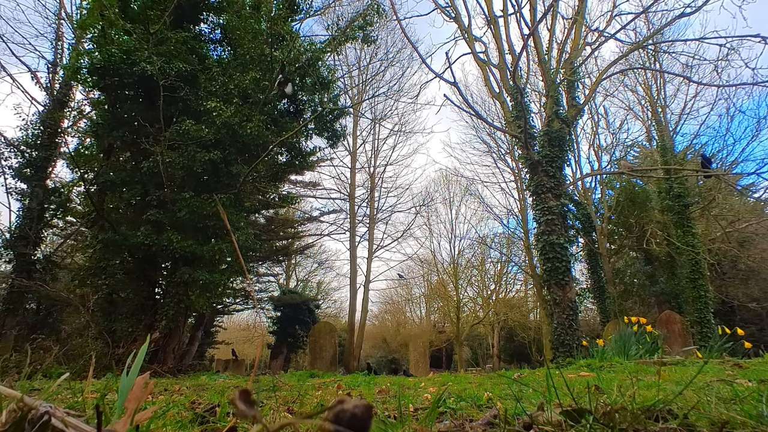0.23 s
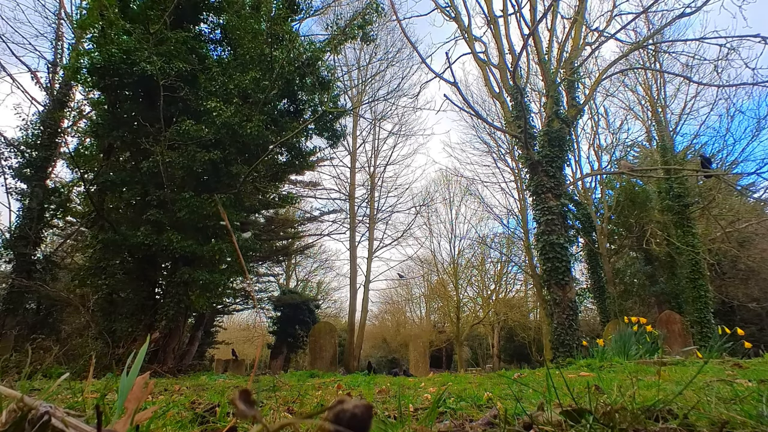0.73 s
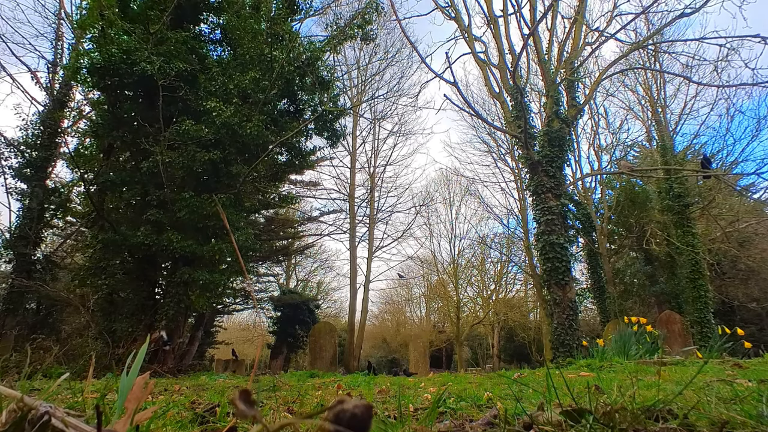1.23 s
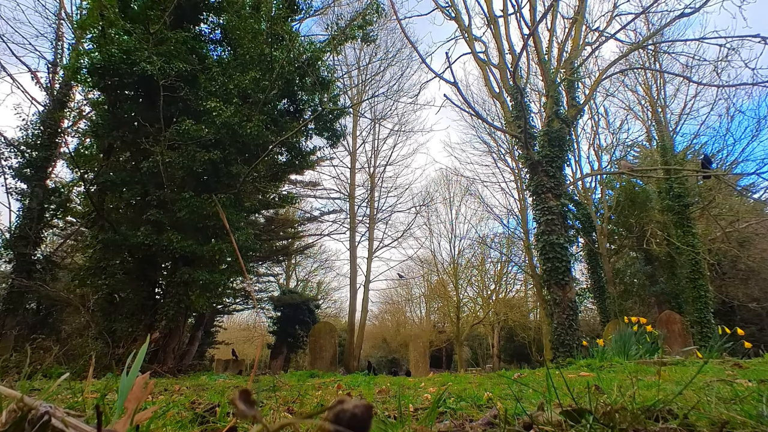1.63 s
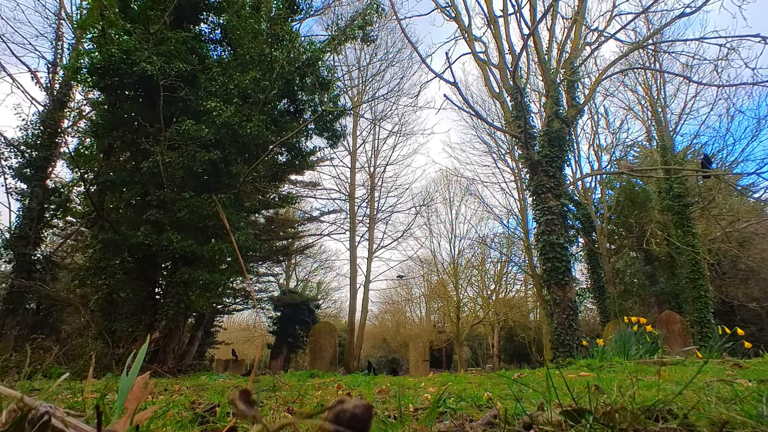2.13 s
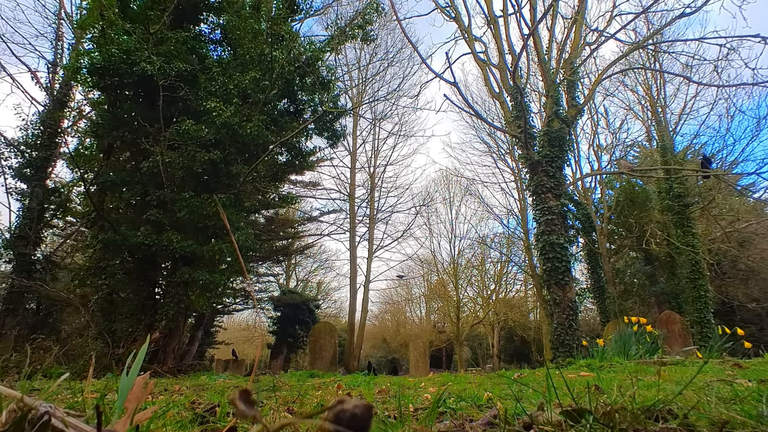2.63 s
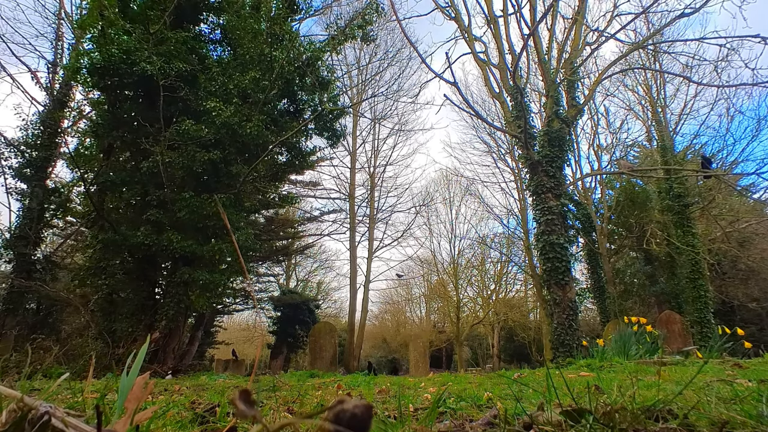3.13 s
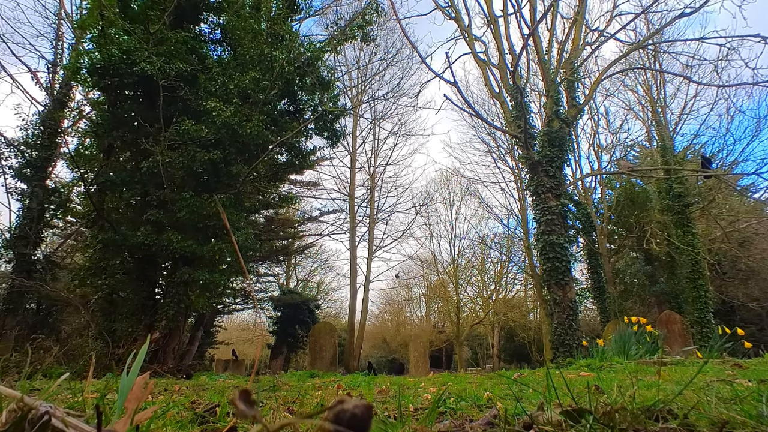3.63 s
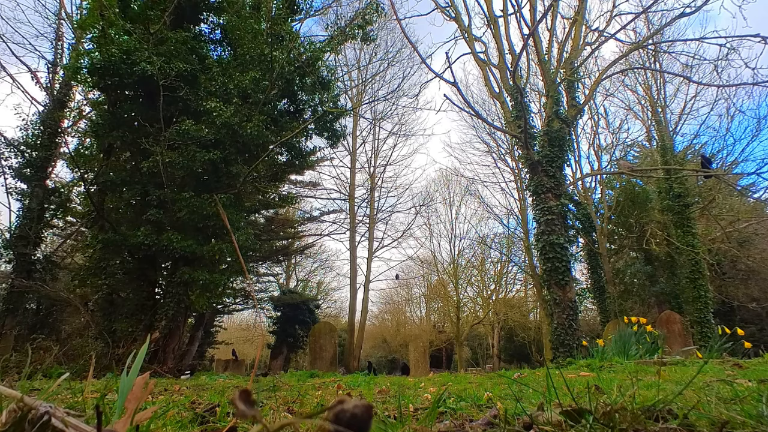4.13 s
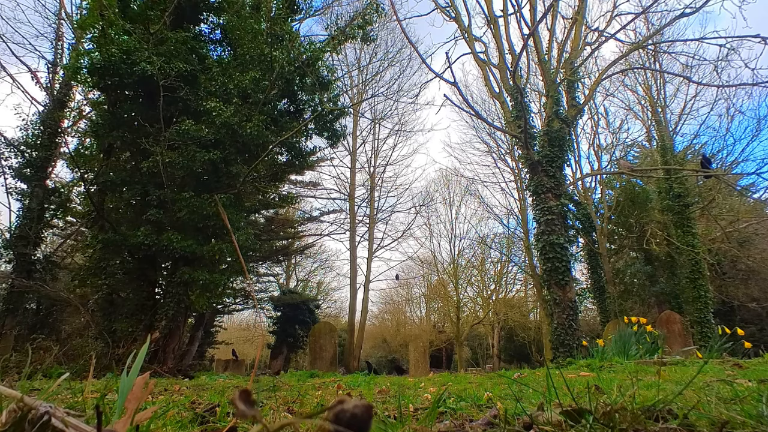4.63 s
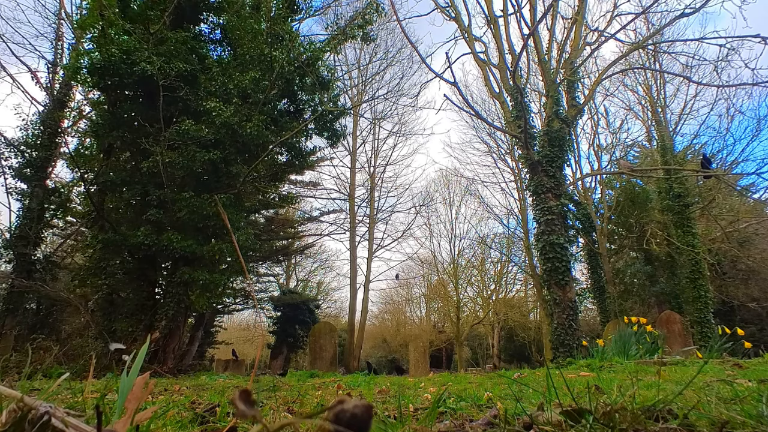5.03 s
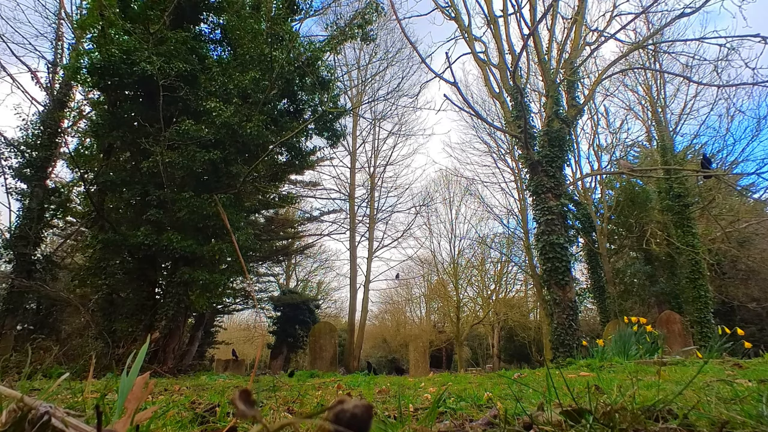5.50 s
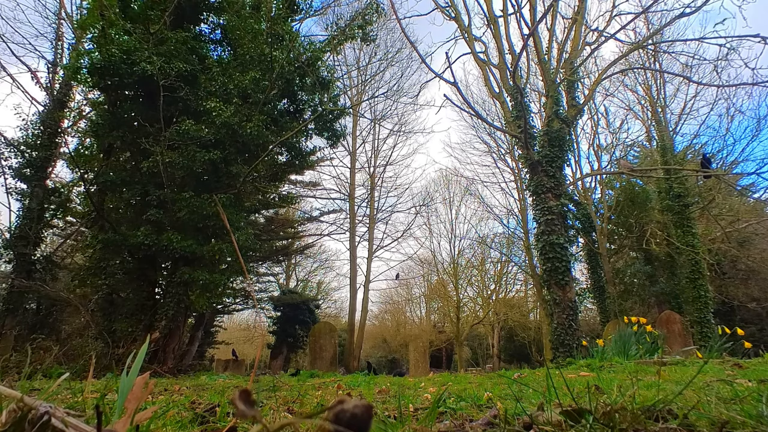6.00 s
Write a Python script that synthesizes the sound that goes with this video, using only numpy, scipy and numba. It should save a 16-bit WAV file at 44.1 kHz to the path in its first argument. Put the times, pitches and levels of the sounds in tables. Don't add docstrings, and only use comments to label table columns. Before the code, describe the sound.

Two distant crows trade rough caws, a plane drones low and fades, small birds peep, and a closer crow gives a loud ringing caw.

```python
import sys
import numpy as np
from scipy import signal
from scipy.fft import rfft, irfft, next_fast_len
from scipy.io import wavfile
from scipy.ndimage import uniform_filter1d
from numba import njit

SR = 44100
rng = np.random.default_rng(int(sys.argv[2]) if len(sys.argv) > 2 else 0)


def voltage_ratio(decibels):
    exponent = np.asarray(decibels, float) / 20
    return 10 ** exponent


def store_wav(level_fs):
    pcm = np.round(np.clip(np.atleast_2d(level_fs), -1, 1) * 32767)
    wavfile.write(sys.argv[1], SR, pcm.T.astype(np.int16))


N = 276066


def unit(x):
    return x / np.sqrt(np.mean(x ** 2))


def even(x):
    return x / np.sqrt(uniform_filter1d(x ** 2, size=1800) + 1e-12)


def steep(x, hz, kind):
    return signal.sosfilt(signal.butter(6, hz, kind, fs=SR, output="sos"), x)


def walk(rate, count=N):
    hold = int(SR / rate)
    steps = np.repeat(rng.standard_normal(count // hold + 1), hold)
    return 1.3 * uniform_filter1d(uniform_filter1d(steps, hold), hold)[:count]


def edges(at, fade_s):
    rise = at - at[0] + (at[0] == 0) * N
    fall = at[-1] - at + (at[-1] > N - 9) * N
    return np.clip(np.minimum(rise, fall) / (fade_s * SR), 0, 1)


@njit
def svf(x, hz, width):
    y, band, low = np.empty(len(x)), 0., 0.
    for i in range(len(x)):
        g, k = np.tan(np.pi * hz[i] / SR), width[i] / hz[i]
        v = (band + g * (x[i] - low)) / (1 + g * (g + k))
        band, low, y[i] = 2 * v - band, low + 2 * g * v, k * v
    return y


@njit
def syrinx(pitch, flutter, swing, lag, stretch):
    n = len(pitch)
    pulses, fast, slow = np.zeros(n + 1), np.empty(n), np.empty(n)
    p, q, j, k = 0., 0., 0, 0
    for i in range(n):
        step = pitch[i] * stretch[0, j] * (1 + swing * np.sin(2 * np.pi * (q + lag))) / SR
        p += step
        q += flutter[i] * stretch[1, k] / SR
        if q >= 1:
            q, k = q - 1, k + 1
        if p >= 1:
            p, j = p - 1, j + 1
            pulses[i] += p / step
            pulses[i + 1] += 1 - p / step
        fast[i], slow[i] = p, q
    return pulses[:-1], fast, slow


def shape(start, length, db, sag, bright_db, name):
    gestures = { "falling": [(0, 281.6, -8, 0.1, -27), (.1, 303, -4, 0.1, -2), (.16, 302.6, -0.5, .01, -2),
                (.34, 306.5, -2.5, 0.41, 3), (.47, 304.8, -0.3, 0.88, -2), (.84, 273.6, -.5, 0.75, -4),
                (.93, 256, -3.5, 1.0, -8.5), (1, 254, -18, 0.4, -17)], "growling": [(0, 560, -15, .1, -27),
                (.08, 578, -5.5, .05, -23), (.18, 582, .5, .02, -8.5), (.3, 577, -1.5, .2, -2),
                (.66, 532, -3, .6, 1.4), (.9, 558, -2.5, 0.6, -1.5), (1, 581, -14, 0.84, -14)],
                "ringing": [(0, 314.7, -14, 0.3, -7), (.08, 345.4, -4.5, 0.6, -0.5),
                (.14, 354.2, -1, .4, -1.5), (.26, 360.2, 0.8, 0.7, -3), (.72, 351.6, -2, 0.67, 0.5),
                (.86, 340.2, -6, .5, 5), (.95, 279.5, -5, 1, -3.5), (1, 240, -19, 0.9, 1)], }
    throats = {"falling": (84, 73), "growling": (80.5, 83.5), "ringing": (66, 59)}
    beaks = {"falling": (1230, 1682), "growling": (1135, 1140), "ringing": (1000, 1236)}
    necks = {"falling": (.42, .88, 1820, 2200, 2760, 3260),
             "growling": (0.44, 0.46, 1700, 1710, 2490, 2820),
             "ringing": (0.66, 0.88, 1920, 1600, 2315, 2770)}
    colours = {"falling": (-5.5, 3.4, -5.5, -9.5), "growling": (1, 0.08, -11, -14.5),
               "ringing": (-17.5, 3.5, -15, -25.5)}
    wander = {"falling": .005, "growling": .022, "ringing": .003}
    at = np.arange(max(int(start * SR), 0), min(int((start + length) * SR), N))
    share = (at / SR - start) / length
    where, *columns = np.transpose(gestures[name])
    pitch, swell_db, beak, strain_db = (np.interp(share, where, c) for c in columns)
    (early, late), (shut_hz, open_hz) = throats[name], beaks[name]
    begin, end, hz2a, hz2b, hz3a, hz3b = necks[name]
    db2, follows, db3, rasp_db = colours[name]

    top_hz = max(columns[0])
    pitch = (top_hz + sag * (pitch - top_hz)) * (1 + wander[name] * walk(14, len(at)))
    flutter = early + (late - early) * share
    strain_db = strain_db + bright_db
    neck = np.clip((share - begin) / (end - begin), 0, 1)
    hz1 = pitch / top_hz * (shut_hz + (open_hz - shut_hz) * np.clip(beak, 0, 1))
    hz2, hz3 = hz2a + (hz2b - hz2a) * neck, hz3a + (hz3b - hz3a) * neck
    return (at, pitch, flutter, db + swell_db, hz1, hz2, db2 + follows * strain_db,
            hz3, db3 + strain_db, rasp_db + strain_db, neck)


def caw(at, pitch, flutter, db, hz1, hz2, db2, hz3, db3, rasp_db, neck, name):
    voices = {"falling": (.58, .035, .2), "ringing": (.46, .024, .7), "growling": (.33, .125, .78)}
    roughness = {"falling": (.012, .04, .4), "ringing": (.007, .05, .48), "growling": (.016, .07, .42)}
    chests = {"falling": (788, -5), "ringing": (813, -5.5), "growling": (860, -16.5)}
    mouth_widths = {"falling": (240, 450, 220), "ringing": (300, 850, 300), "growling": (450, 640, 520)}
    loose = {"falling": (1.4, -6, -17, -3), "growling": (.1, 1, -8, -15), "ringing": (.1, -7, -6, -6)}
    # centre in Hz, width in Hz, level in dB.
    rasp_bands = [(4880, 430, -9.5), (6190, 900, 2.5), (6510, 570, 1.5), (7560, 1320, -7),
                  (9800, 3400, -35)]
    depth, swing, lag = voices[name]
    scatter, stagger, breath = roughness[name]
    chest_hz, chest_db = chests[name]
    width1, width2, width3 = mouth_widths[name]
    widening, lowest_db, *breath_db = loose[name]
    count = len(at)

    stretch = 1 + np.array([[scatter], [stagger]]) * rng.standard_normal((2, 512))
    pulses, fast, slow = syrinx(pitch, flutter, swing, lag, stretch)
    gate = 1 - depth * (.5 + .5 * np.cos(2 * np.pi * slow))
    puffs = unit(np.exp(-fast / .4) * rng.standard_normal(count))
    source = gate * (unit(pulses) + breath * puffs)
    hoarse = gate * (0.37 * unit(pulses) + puffs)

    def ring(x, hz, width):
        hz, width = hz + 0 * pitch, width + 0 * pitch
        return svf(svf(x, hz, width), hz, width)

    def patch():
        return voltage_ratio(1.8 * walk(21.6, count))

    mouth = patch() * even(ring(source, hz1, width1))
    mouth += voltage_ratio(chest_db) * even(ring(source, chest_hz, 450))
    mouth -= voltage_ratio(db2) * patch() * even(ring(source, hz2, width2))
    third = patch() * even(ring(source, hz3, width3 * (1 + widening * neck)))
    breathy = even(ring(ring(hoarse, 0.736 * hz3, 880), 0.96 * hz3, 1200))
    third = third + voltage_ratio(np.interp(neck, [0, 1], breath_db)) * breathy
    mouth = steep(mouth, 2280, "low") + voltage_ratio(db3) * steep(third, 1990, "high")

    rasp = 0
    for i, (hz, width, band_db) in enumerate(rasp_bands):
        hz = hz * (1 + .008 * walk(9, count))
        band_db = band_db + 3.5 * walk(14, count)
        if i == 0:
            band_db = band_db + lowest_db
        if i == len(rasp_bands) - 1:
            band_db = band_db + 3 * walk(8, count)
        rasp = rasp + voltage_ratio(band_db) * ring(ring(hoarse, hz, width), hz, 2 * width)
    voice = steep(mouth, 3200, "low") + voltage_ratio(rasp_db) * even(rasp)
    return voltage_ratio(db) * edges(at, fade_s=0.013) * voice


def crows():
    caws = { "falling": [(-.355, .42, -46, 1, -9), (.36, 0.42, -41, 0.92, -2.2), (1.09, .42, -38, .95, -8),
            (1.87, .40, -39, 1.1, -4)], "growling": [(1.06, 0.35, -41.5, 0.83, 4.5),
            (1.59, .39, -39.5, 1.5, -0.9), (2.27, .395, -42, .9, 0.8), (2.955, 0.41, -38.5, .35, -2)],
            "ringing": [(5.575, .355, -28, 1.01, -0.2)], }
    out = np.zeros(N)
    for name, calls in caws.items():
        for call in calls:
            at, *controls = shape(*call, name)
            out[at] += caw(at, *controls, name)
    return out


def trees(x):
    t60_s, build_s, level_db = .4, 0.043, -22.5
    t = np.arange(SR // 2) / SR
    tail = rng.standard_normal(len(t)) * voltage_ratio(-60 * t / t60_s) * np.clip(t / build_s, 0, 1)
    tail = svf(tail, np.full(len(t), 1400.), np.full(len(t), 760.))
    return signal.fftconvolve(x, tail / np.sqrt(np.sum(tail ** 2)))[:N] * voltage_ratio(level_db)


def read(table):
    s, *columns = np.transpose(table)
    at = np.arange(int(s[0] * SR), min(int(s[-1] * SR), N))
    return at, [np.interp(at / SR, s, c) for c in columns]


def plane():
    # time in seconds, blade rate in Hz, level in dB.
    flight = [
        (0.0, 88.3, -62.5),
        (2.3, 85.65, -58),
        (2.9, 83.5, -55.5),
        (3.4, 81.67, -41.5),
        (4.1, 80, -49),
        (5.0, 75.04, -45),
        (5.9, 71, -46),
        (6.26, 70.2, -58),
    ]
    partials_db = (-2, -6.5, -13)
    waver, fading_db = .028, 3.6
    at, (hz, db) = read(flight)
    turn = 2 * np.pi * np.cumsum(hz * (1 + waver * walk(10)[at])) / SR
    out = np.zeros(N)
    for k, partial_db in enumerate(partials_db, 1):
        out[at] += voltage_ratio(db + partial_db + fading_db * walk(9)[at]) * np.sin(k * turn)
    return out


def treble_dips():
    dips = [.032, .224, .309, .523, 1.270, 2.315, 2.720, 2.741, 2.805, 3.168, 3.403, 3.574, 3.659, 3.723,
            3.766, 3.958, 4.576, 5.878, 6.155]
    fade_s = 1024 / 48000
    t = np.arange(N) / SR
    return 1 - .93 * sum(np.cos(np.pi / 2 * np.clip((t - s) / fade_s, -1, 1)) ** 2 for s in dips)


def air():
    # frequency in Hz, density in dB per Hz.
    spectrum = [(18, -70), (30, -27.5), (38, -30), (60, -20.5), (81, -3), (113, -8.5), (236, -4.5),
                (407, -12.5), (771, -15.5), (1100, -16.5), (1530, -36), (4050, -44), (4670, -43.5),
                (5140, -45), (8650, -54.5), (11200, -59.5), (19000, -120)]
    # time in seconds, rumble in dB, traffic and wind in dB.
    swell = [
        (0.0, -50, -76),
        (1.0, -50.5, -77),
        (2.5, -48.5, -75),
        (3.051, -42, -78),
        (4.3, -51, -78.5),
        (5.2, -46.5, -78.5),
        (6.26, -43.5, -77),
    ]
    size = next_fast_len(N)
    octave = np.log2(np.maximum(np.arange(size // 2 + 1) * SR / size, 1))
    hz, db = np.transpose(spectrum)
    noise = rfft(rng.standard_normal(size)) * voltage_ratio(np.interp(octave, np.log2(hz), db))
    noise /= np.std(irfft(noise * (abs(octave - 9.58) < .77), size))
    s, *levels_db = np.transpose(swell)
    rumble, wind = (np.interp(np.arange(N) / SR, s, c - np.mean(c)) for c in levels_db)
    out, kept, gusts = 0, treble_dips(), walk(12)
    for centre in np.arange(4, 14.6, .5):
        band = irfft(noise * np.clip(1 - 2 * abs(octave - centre), 0, 1), size)[:N]
        if 11 <= centre <= 13.5:
            band *= kept
        low, high = np.clip((10.2 - centre) / 3.05, 0, 1), np.clip(centre - 10.4, 0, 1)
        band_db = low * (rumble + 1.22 * gusts + 2.4 * walk(11)) + high * wind
        band_db = band_db + 0.99 * walk(3.2) + 2.5 * (1 - high) * walk(14)
        out = out + band * voltage_ratio(band_db)
    return out * voltage_ratio(-51.5)


def small_birds():
    # start in seconds, length in seconds, pitch in Hz, glide in Hz per second, level in dB.
    peeps = [
        (4.308, 0.072, 4100, -2500, -62),
        (4.39, .08, 3870, -600, -67.5),
        (4.396, 0.074, 6150, 700, -70),
        (4.531, 0.055, 4300, 4000, -58),
        (4.618, .2, 2790, 50, -76),
        (5.427, 0.11, 4480, -900, -59.5),
        (5.757, .07, 4010, -2200, -61),
        (5.83, .06, 3940, -500, -64.5),
        (6.042, 0.2, 3740, -250, -71),
        (6.225, .04, 3710, -200, -75),
    ]
    rise_share, start_db, end_db = 0.38, -20, -13
    out, waver, tremble = np.zeros(N), 1 + .014 * walk(260), voltage_ratio(5 * walk(150))
    for start, length, hz, glide, db in peeps:
        at = np.arange(int(start * SR), min(int((start + length) * SR), N))
        t = at / SR - start
        swell_db = np.interp(t / length, [0, rise_share, 1], [start_db, 0, end_db])
        turn = 2 * np.pi * np.cumsum((hz + glide * t) * waver[at]) / SR
        out[at] += voltage_ratio(db + swell_db) * edges(at, fade_s=0.0047) * np.sin(turn)
    return out * tremble


def clucks():
    # start in seconds, peak in dB, resonance in Hz.
    beats = [
        (5.569, -30, 1090),
        (5.58, -26.5, 1200),
        (6.2475, -32, 1080),
        (6.2588, -27, 1150),
    ]
    attack_s, decay_s = 0.00074, 0.0058
    out, t = np.zeros(N + 800), np.arange(800) / SR
    for s, db, hz in beats:
        envelope = voltage_ratio(db) * np.clip(t / attack_s, 0, 1) * np.exp(-t / decay_s)
        out[int(s * SR):][:len(t)] += envelope * np.sin(2 * np.pi * hz * t)
    return out[:N]


def scene():
    birds = crows() + clucks() + small_birds()
    return (birds + trees(birds) + plane() + air())[None]


def band_limit(x):
    return signal.sosfilt(signal.butter(12, 15720, fs=SR, output="sos"), x)


def record(dry):
    hiss = voltage_ratio(-87) * steep(rng.standard_normal(N), 6000, "high")
    return band_limit(dry + hiss)


dry = scene()
out = record(dry)
store_wav(out)
```